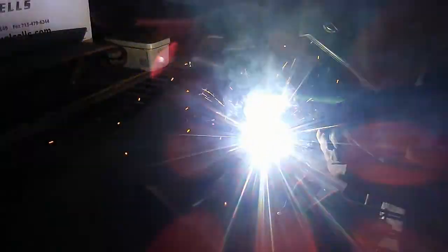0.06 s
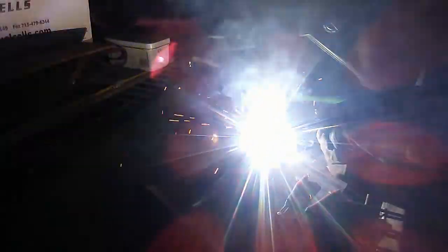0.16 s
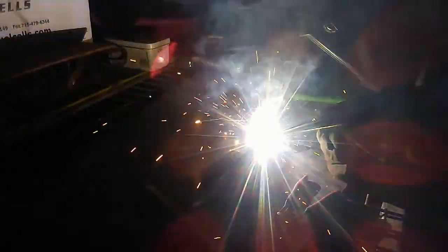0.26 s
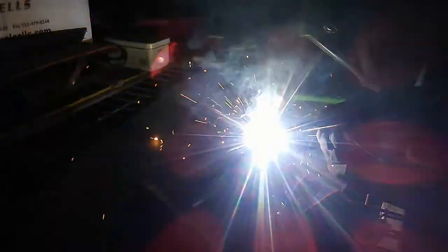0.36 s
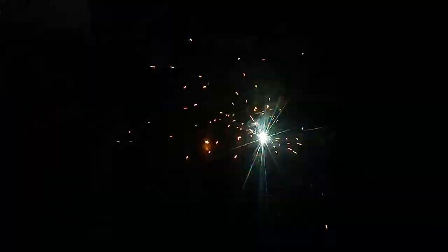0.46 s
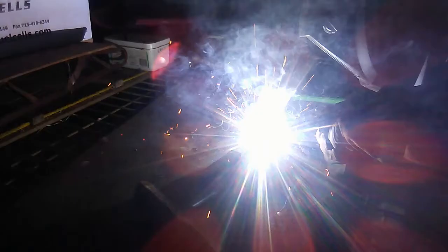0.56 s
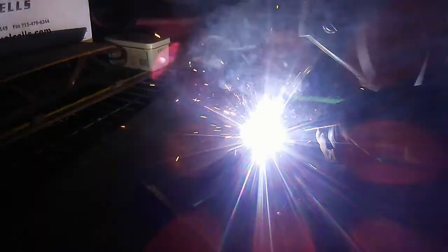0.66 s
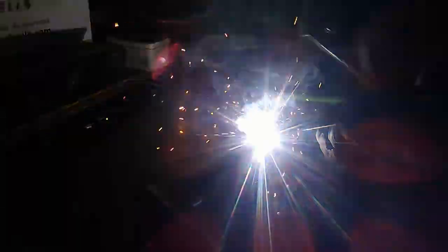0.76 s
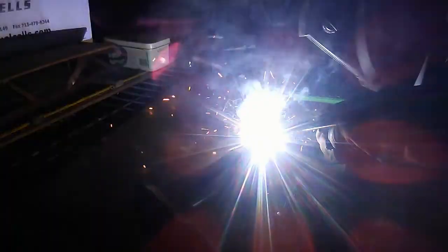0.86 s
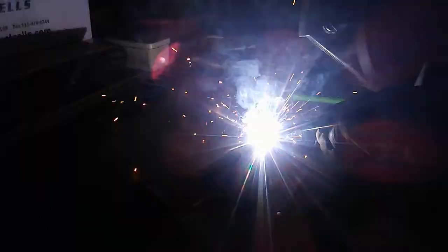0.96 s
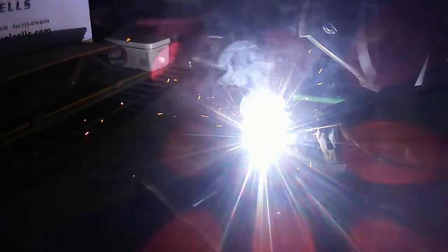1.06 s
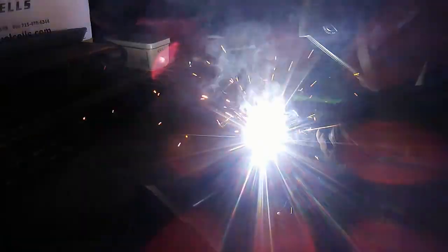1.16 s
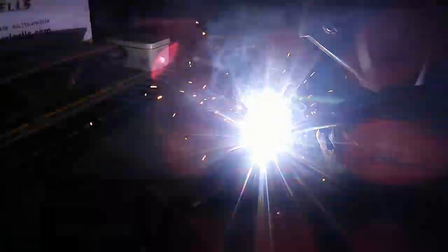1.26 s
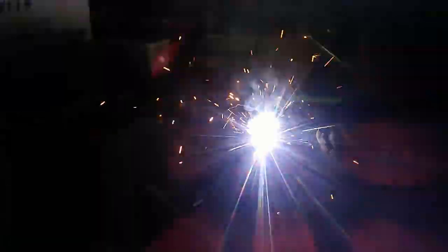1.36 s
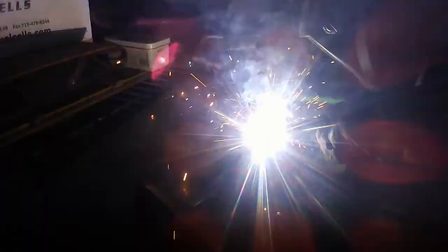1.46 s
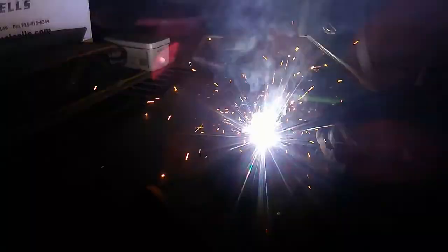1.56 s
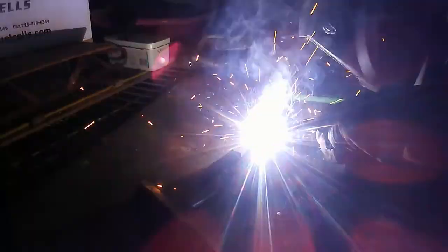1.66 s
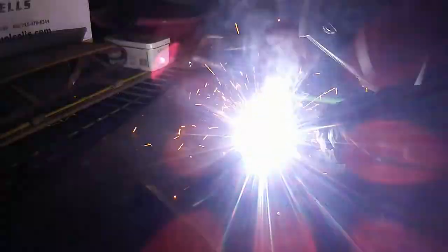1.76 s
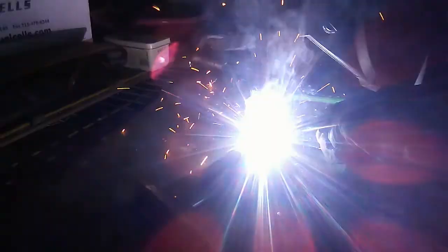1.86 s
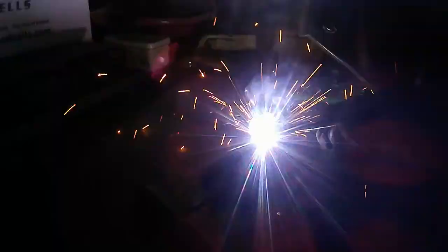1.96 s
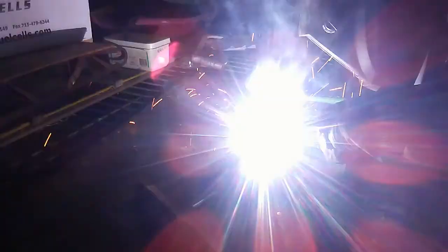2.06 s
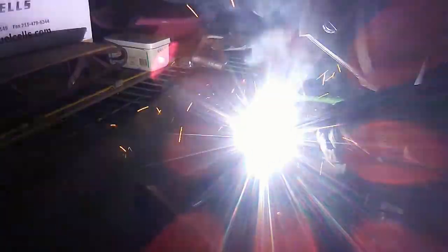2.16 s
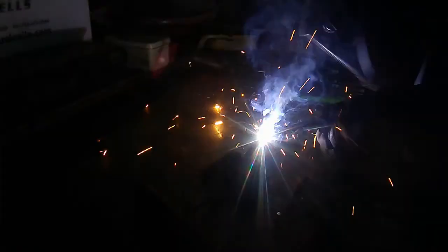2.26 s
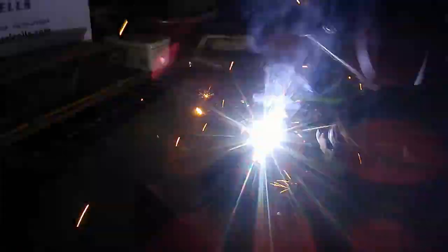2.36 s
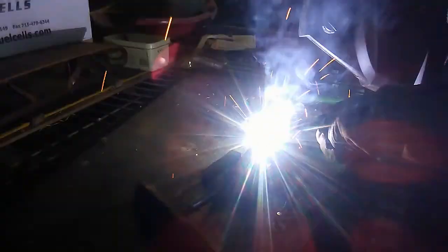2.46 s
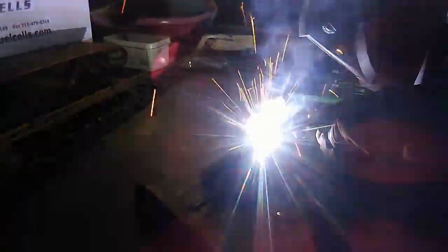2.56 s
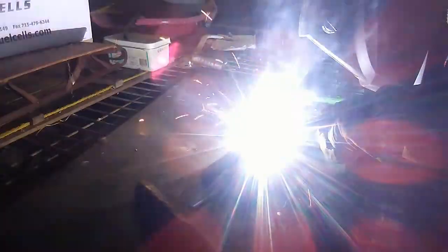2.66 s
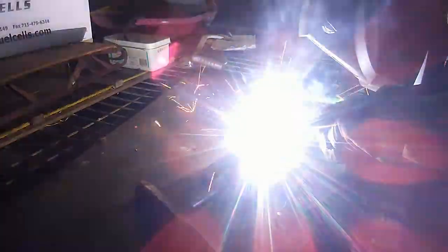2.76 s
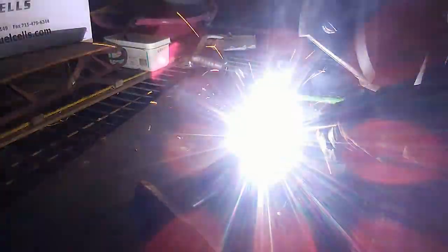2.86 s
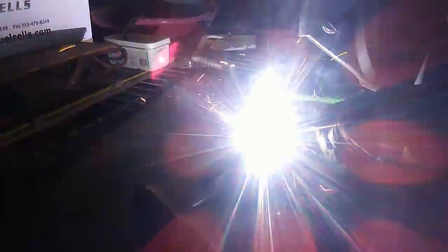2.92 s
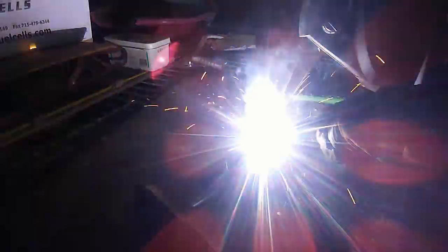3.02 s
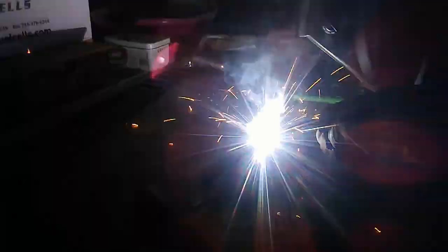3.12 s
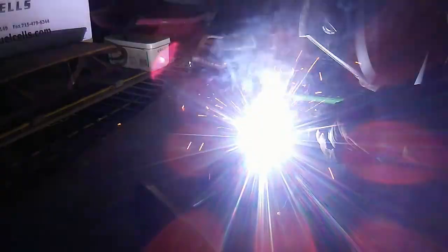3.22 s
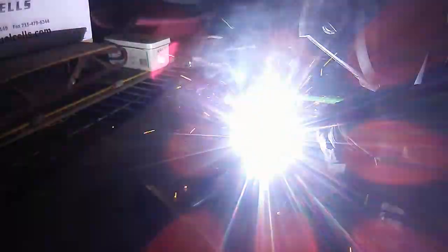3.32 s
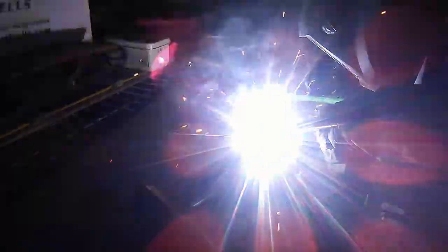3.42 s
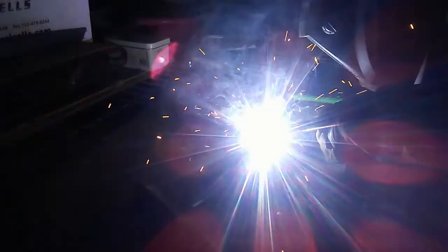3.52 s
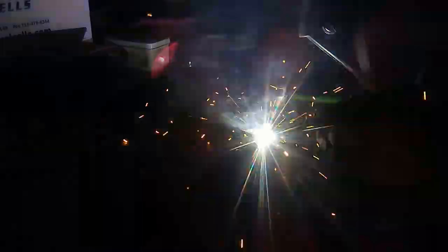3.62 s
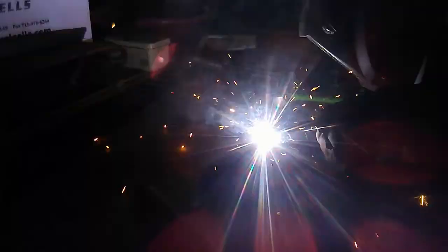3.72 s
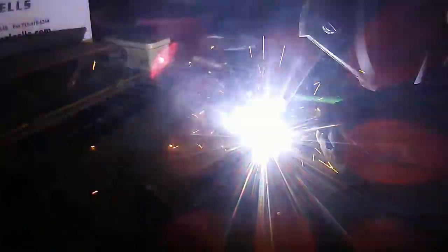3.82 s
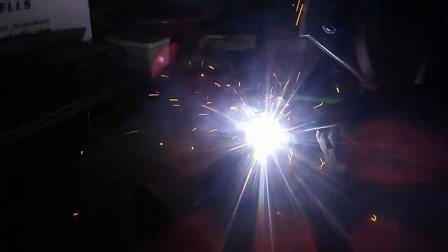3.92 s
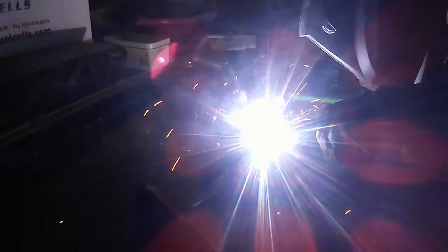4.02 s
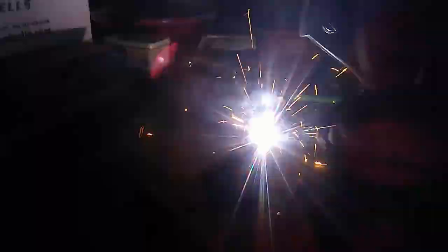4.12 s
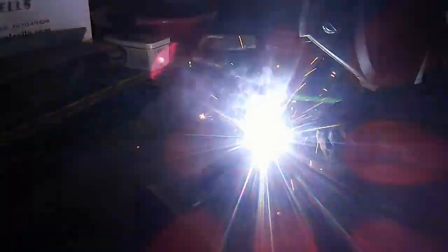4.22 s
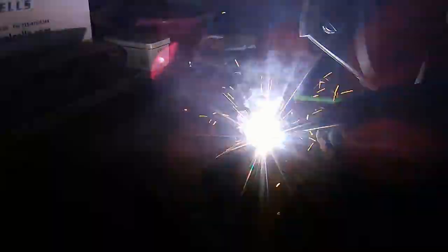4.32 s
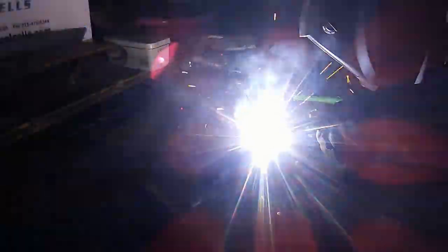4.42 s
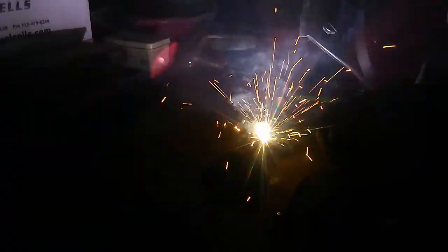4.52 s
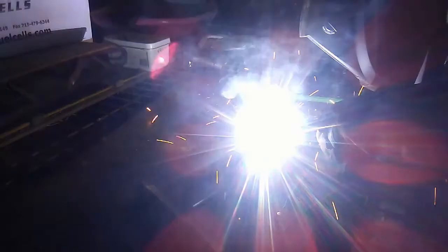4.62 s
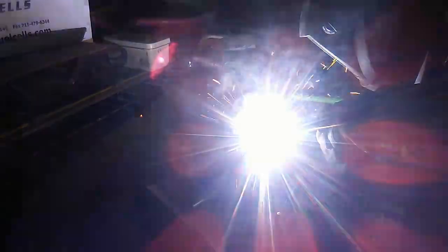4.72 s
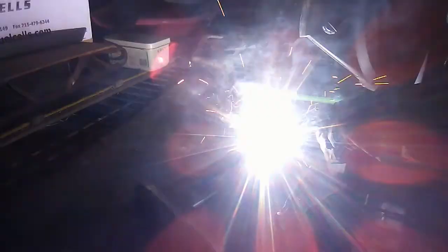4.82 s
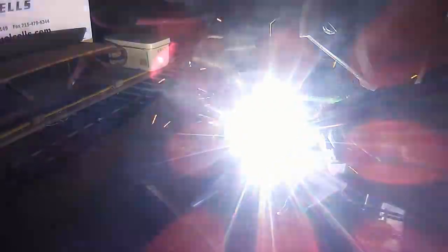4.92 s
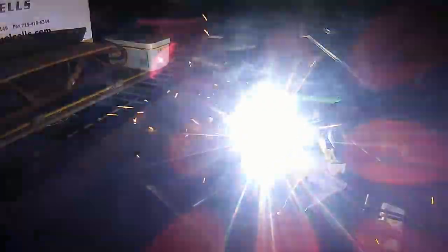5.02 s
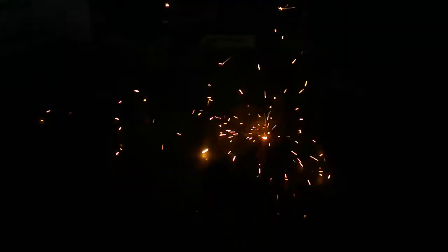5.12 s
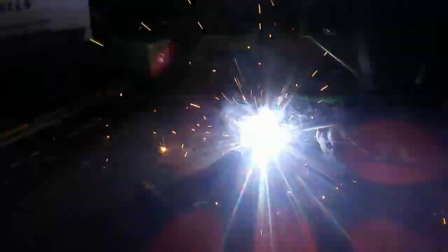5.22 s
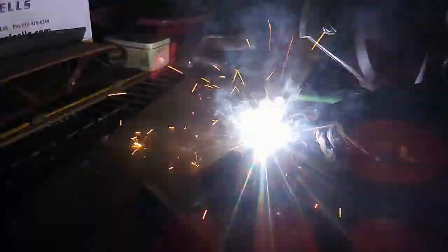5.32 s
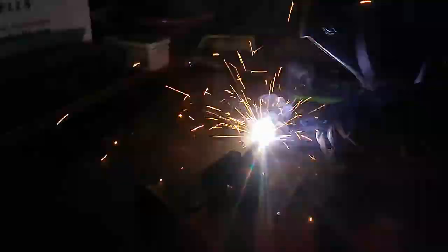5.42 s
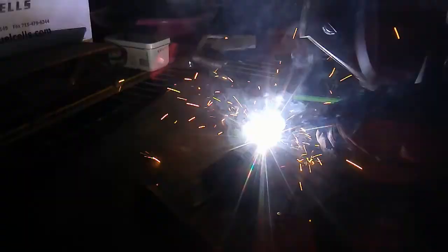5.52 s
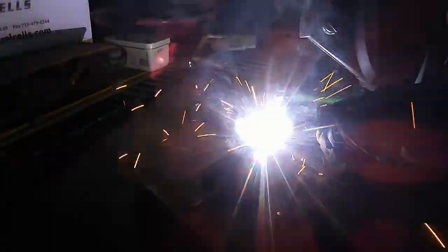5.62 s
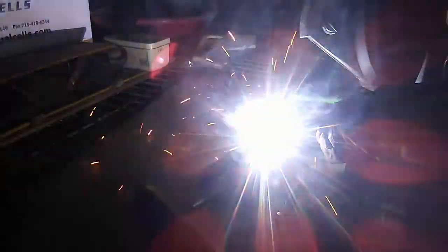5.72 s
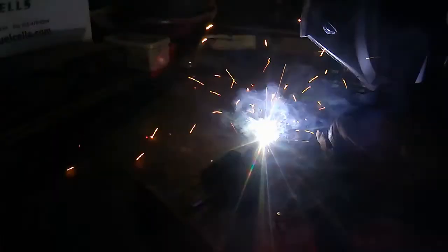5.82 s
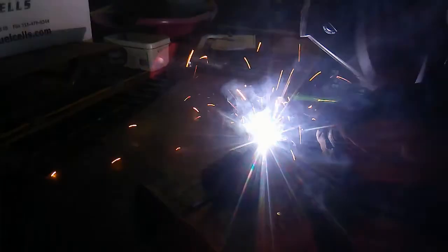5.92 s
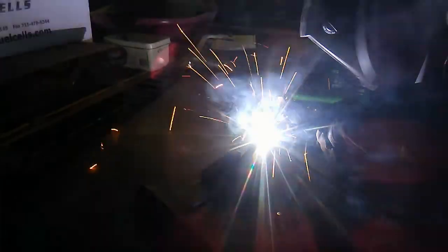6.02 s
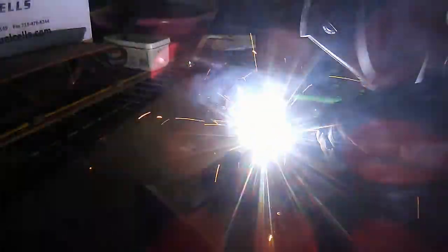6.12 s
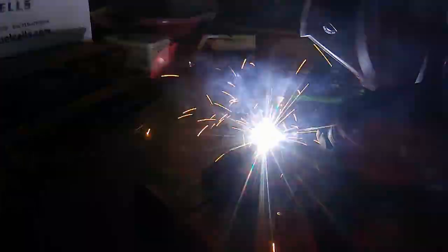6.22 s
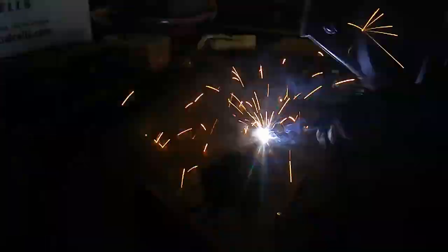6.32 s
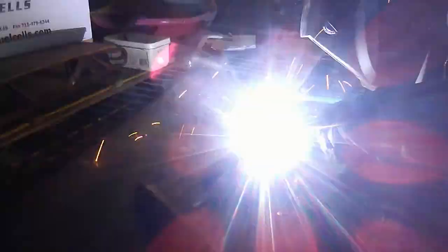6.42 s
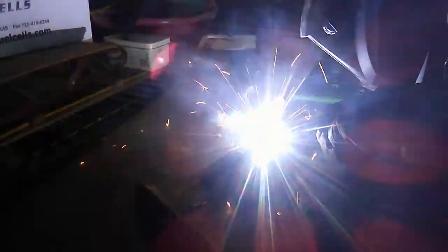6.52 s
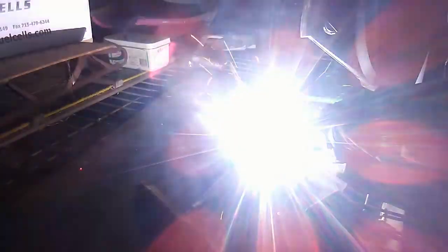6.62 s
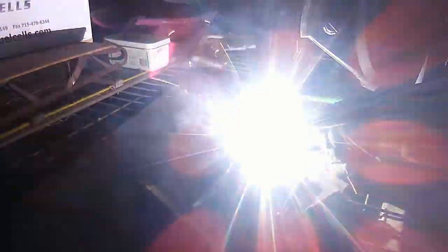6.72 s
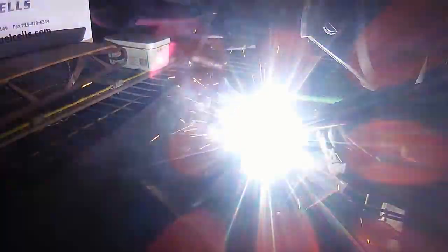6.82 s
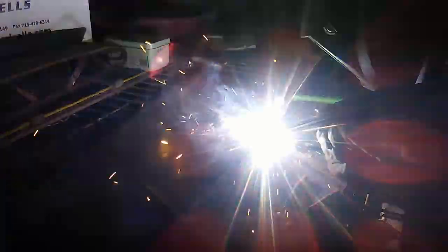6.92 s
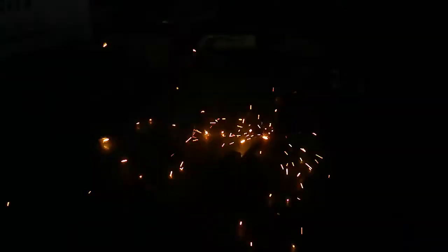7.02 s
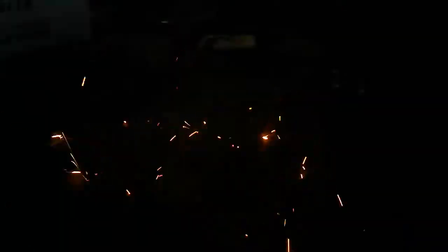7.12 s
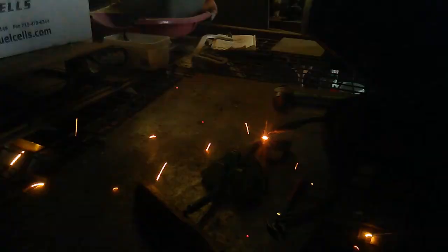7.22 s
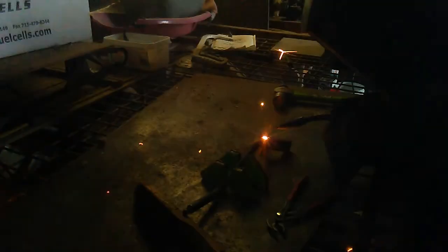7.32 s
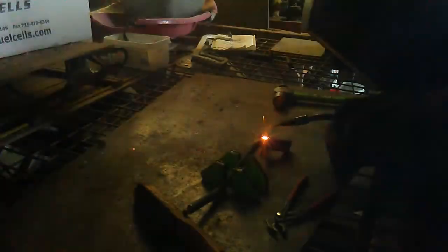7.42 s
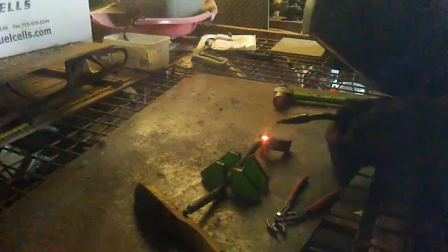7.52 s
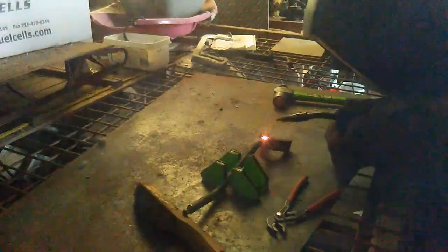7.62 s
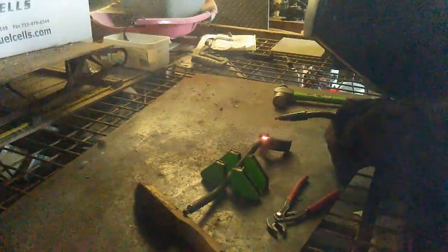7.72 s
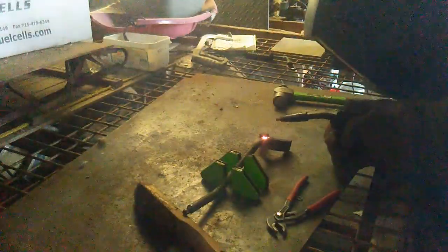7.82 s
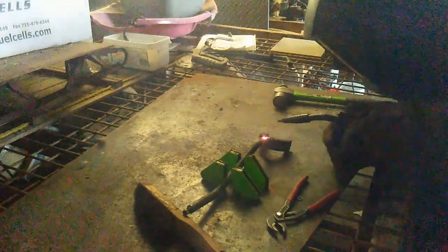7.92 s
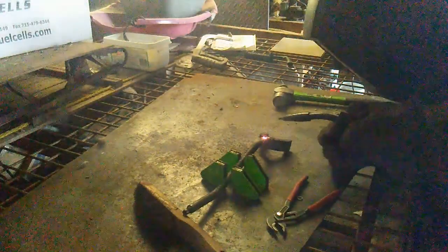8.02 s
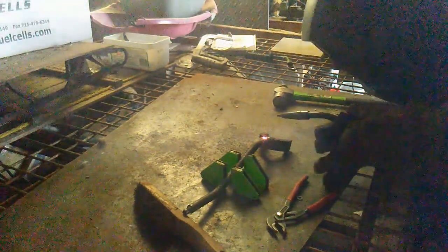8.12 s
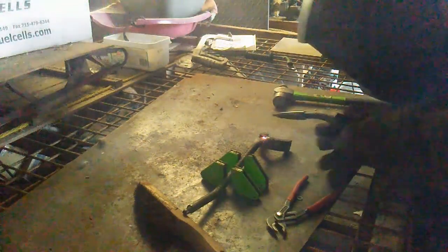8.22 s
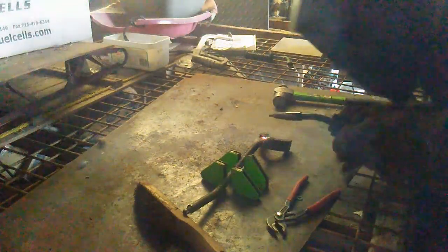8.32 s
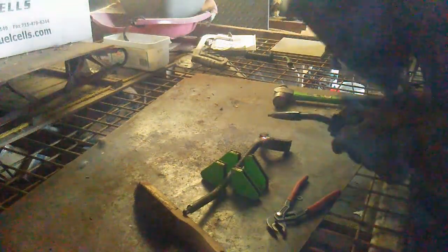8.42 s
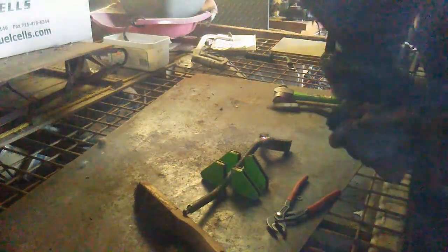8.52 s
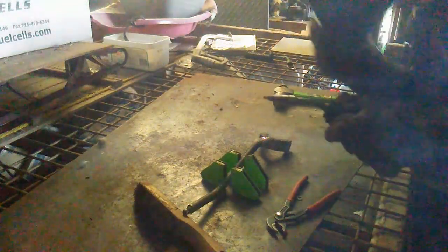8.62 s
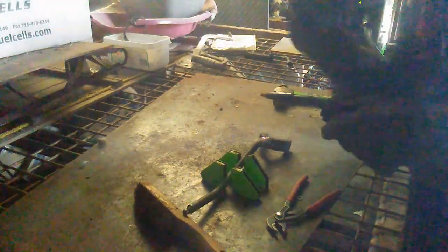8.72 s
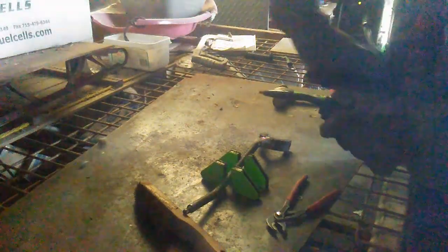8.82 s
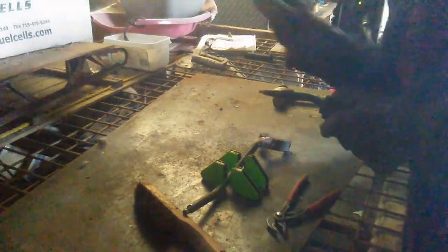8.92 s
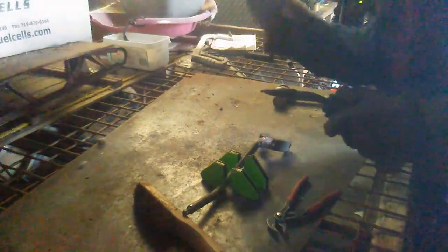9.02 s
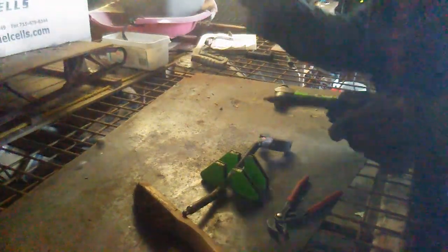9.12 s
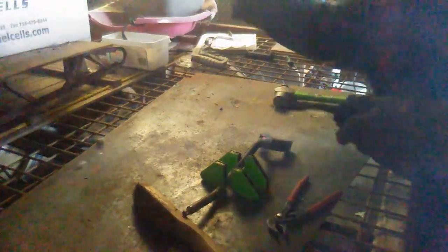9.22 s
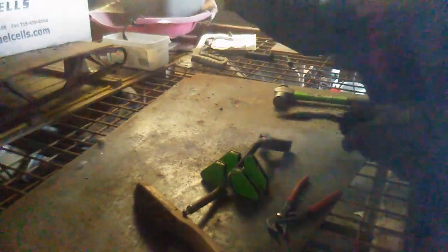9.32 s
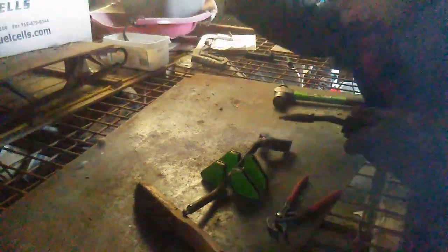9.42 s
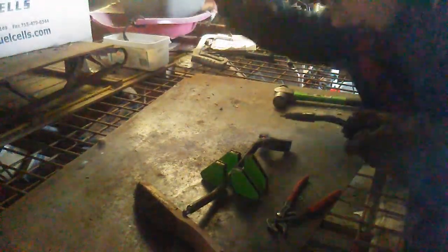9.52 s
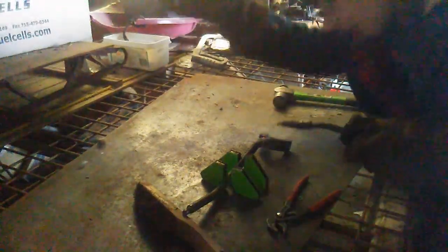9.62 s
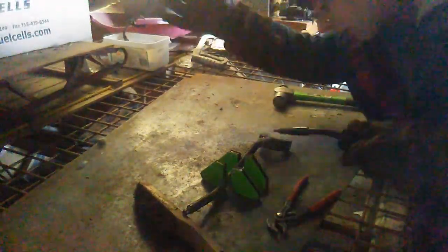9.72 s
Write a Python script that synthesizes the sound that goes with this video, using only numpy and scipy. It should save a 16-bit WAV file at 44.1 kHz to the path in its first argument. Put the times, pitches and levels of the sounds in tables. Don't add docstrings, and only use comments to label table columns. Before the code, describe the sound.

A wire-feed welder crackles and spits loudly up close, stops dead after about seven seconds, leaving a quiet fan and rustling, scraping gear.

```python
import sys
import numpy as np
from scipy import signal
from scipy.fft import rfft, irfft
from scipy.io import wavfile

SR = 44100
rng = np.random.default_rng(int(sys.argv[2]) if len(sys.argv) > 2 else 0)


def voltage_ratio(decibels):
    exponent = np.asarray(decibels, float) / 20
    return 10 ** exponent


def pcm_store(signal):
    levels = np.round(np.clip(np.atleast_2d(signal), -1, 1) * 32767)
    wavfile.write(sys.argv[1], SR, levels.astype(np.int16).T)


N = 430857


def rms_one(x):
    return x / np.sqrt(np.mean(x ** 2) + 1e-20)


def level(rows):
    s, db = np.transpose(rows)
    return voltage_ratio(np.interp(np.arange(N) / SR, s, db, left=-200, right=-200))


def at_hz(points, hz):
    table_hz, values = np.transpose(points)
    return np.interp(np.log(hz + 1), np.log(table_hz), values)


def coloured(x, points, size=8192):
    shape_db = at_hz(points, np.fft.rfftfreq(size, 1 / SR))
    cepstrum = irfft(np.log(voltage_ratio(shape_db)))
    cepstrum[1:size // 2] *= 2
    cepstrum[size // 2 + 1:] = 0
    impulse_response = irfft(np.exp(rfft(cepstrum)))
    return signal.fftconvolve(x, impulse_response)[:len(x)]


def resonance(x, hz, width_hz):
    r = np.exp(-np.pi * width_hz / SR)
    poles = [1, -2 * r * np.cos(2 * np.pi * hz / SR), r * r]
    return signal.lfilter([(1 - r * r) / 2, 0, (r * r - 1) / 2], poles, x + 1e-18)


def low_pass(x, hz):
    return signal.sosfilt(signal.butter(2, hz, fs=SR, output="sos"), x)


def dying(x, t60):
    return signal.lfilter([1], [1, -voltage_ratio(-60 / (t60 * SR))], x)


def clicks(times, gains):
    out = np.zeros(N)
    places = (np.asarray(times) * SR).astype(int)
    np.add.at(out, np.minimum(places, N - 1), gains)
    return out


def grains(per_s, spread_db):
    sizes = voltage_ratio(spread_db * np.minimum(rng.exponential(1, N), 3))
    signs = rng.choice([-1, 1], N)
    return rms_one(sizes * signs * (rng.random(N) < per_s / SR))


def drift(per_s):
    knots = rng.standard_normal(N // 256 + 2)
    return rms_one(np.interp(np.arange(N) * per_s / SR, np.arange(len(knots)), knots))


# pitch_hz, width_hz, lift_db
RINGS = [(900, 20, 0.5), (3372, 45, -2), (3790, 160, -4), (7400, 130, -5), (8300, 110, -7)]
# pitch_hz, level_db
MIC = [(40, -45), (110, -44.5), (220, -15), (480, -1.5), (1600, 0.5), (2100, -7.5), (3200, -0.5), (4080, 0),
       (4330, -16.5), (5000, -24), (5900, -8), (8000, 1.5), (13300, -10.5), (15600, -15.5)]


def microphone(x):
    for hz, width_hz, db in RINGS:
        x = x + voltage_ratio(db) * resonance(x, hz, width_hz)
    return coloured(x, MIC)


# pitch_hz, level_db
FAN_TONES = [(398, -64), (468, -63), (516.8, -52), (710.6, -64), (1034, -64), (1184, -64), (1475, -64)]
# pitch_hz, level_db (per Hz)
FAN_AIR = [(40, 8.5), (85, 14.5), (130, -1), (250, -0.5), (500, -9), (1200, -18), (1800, -17),
           (2600, -16.5), (4000, -29.5), (7000, -52), (15500, -33)]


def fan():
    out = rms_one(microphone(coloured(rng.standard_normal(N), FAN_AIR))) * voltage_ratio(-47)
    t = np.arange(N) / SR
    for hz, db in FAN_TONES:
        tone = np.sqrt(2) * np.sin(2 * np.pi * (hz * t + rng.random()))
        waver = rms_one(resonance(rng.standard_normal(N), hz, width_hz=11.0))
        out += voltage_ratio(db) * (tone + 0.3 * waver)
    return out


# pitch_hz, t60_s
GARAGE = [(200, .42), (1000, .42), (3500, .4), (8000, .37), (14000, .31)]
# pitch_hz, level_db
RETURN = [(200, 4.5), (280, 0), (500, -11), (1500, -1.5), (2200, 5.5), (3700, 3.5), (6000, 2), (9000, -1.5),
          (15500, 2.5)]


def answer():
    t = np.arange(SR // 2) / SR
    edges = 125 * 2 ** np.arange(0, 7.2, .5)
    tail = 0
    for low, high in zip(edges, edges[1:]):
        band_pass = signal.butter(2, [low, high], "band", fs=SR, output="sos")
        band = signal.sosfilt(band_pass, rng.standard_normal(len(t)))
        tail = tail + band * voltage_ratio(-60 * t / at_hz(GARAGE, np.sqrt(low * high)))
    tail = voltage_ratio(-33.5) * tail * np.clip(t / 0.0023, 0, 1)
    near = voltage_ratio(-19.5) * rng.standard_normal(len(t)) * voltage_ratio(-60 * t / 0.0085)
    near = near * np.clip(t / 0.00023, 0, 1)
    return coloured(tail + near, RETURN)


# delay_s, level_db, centre_hz, width_hz
ECHOES = [
    (.0015, -1.5, 3760, 903),
    (.0026, -1.5, 7000, 5180),
    (.0026, -13.5, 700, 900),
    (.0043, -3, 3600, 1500),
    (0.015, -26, 8000, 8e3),
]


def surroundings(x):
    turn = 1.385 * drift(per_s=6.0)
    hard = 0
    for s, db, hz, width_hz in ECHOES:
        hard = hard + resonance(clicks([s], voltage_ratio(db))[:SR // 10], hz, width_hz)
    out = signal.fftconvolve(x, hard)[:N]
    for share in (np.cos(turn), np.sin(turn)):
        out = out + signal.fftconvolve(x * share, answer())[:N]
    return out


def strokes(rows):
    gain = 0
    for s, swell, sink, db in rows:
        gain = gain + level([(s - swell, db - 20), (s, db), (s + sink, db - 20)])
    return gain


# strongest_s, swell_s, sink_s, level_db
RUSTLE = [(7.355, .06, 0.054, -56), (7.43, 0.055, 0.1, -62), (7.63, 0.13, .12, -72), (7.79, .1, .1, -72.5),
          (7.94, 0.09, 0.13, -75), (8.13, 0.051, 0.21, -52), (8.38, .45, .45, -55), (8.74, .14, .2, -57),
          (8.91, .03, .1, -55), (9.02, .16, .16, -45), (9.2, .3, .4, -62), (9.43, .06, .15, -58),
          (9.64, 0.18, .35, -62)]


def rustle():
    cloth = low_pass(grains(12000, spread_db=3.0), hz=10600)
    cloth = (cloth - low_pass(cloth, hz=3500)) * voltage_ratio(1.5 * drift(per_s=40))
    return voltage_ratio(5.0) * strokes(RUSTLE) * cloth


# strongest_s, swell_s, sink_s, level_db
SCRAPE = [
    (8.685, .035, .025, -42),
    (8.738, .025, .04, -39),
    (8.908, .012, .06, -42),
    (8.965, .05, .05, -41),
    (8.995, .04, .03, -37),
    (9.025, .02, .06, -35),
    (9.06, .04, .05, -39),
    (9.095, .04, .04, -41),
    (9.47, .1, .1, -48),
]


def scrape():
    grit = grains(4000, spread_db=2.0) * voltage_ratio(1.2 * drift(per_s=90))
    grit = low_pass(low_pass(grit, hz=4500), hz=2720)
    return voltage_ratio(2.0) * strokes(SCRAPE) * rms_one(grit)


# start_s, peak_db, pitch_hz, t60_s
KNOCKS = [
    (8.735, -23.5, 418, 0.028),
    (9.0184, -20, 1420, 0.0067),
    (9.339, -24, 457, 0.044),
]


def knocks():
    out = np.zeros(N)
    for s, db, hz, t60 in KNOCKS:
        width_hz = np.log(1000) / (np.pi * t60)
        peak = voltage_ratio(db - 1.5) * SR / (2 * np.pi * width_hz)
        soft_blow = low_pass(clicks([s], peak), 2 * hz)
        out += resonance(soft_blow, hz, width_hz)
    return out


# start_s, peak_db
TICKS = [
    (8.6874, -24),
    (8.9895, -37),
    (9.0167, -27.5),
    (9.2275, -30),
    (9.2352, -30),
]


def crease_snaps():
    s, db = np.transpose(TICKS)
    burst = dying(clicks(s, voltage_ratio(db - 6.5)), t60=0.023)
    burst = low_pass(burst * rng.standard_normal(N), hz=7500)
    return np.diff(burst, n=2, prepend=[0, 0])


def handling():
    return rustle() + scrape() + knocks() + crease_snaps()


# start_s, bluntness (0-1)
BLUNT = [(0, 0.07), (2.2, 0.09), (4.5, 1), (6.3, 1), (7.1, 0.78)]


def crack(s, db):
    blunt = np.interp(s, *np.transpose(BLUNT)) + 0.18 * rng.standard_normal(len(s))
    blunt = np.clip(blunt, 0, 1)
    shares = [1 - blunt / 2, blunt, blunt / 2]
    return sum(clicks(s + k / SR, -voltage_ratio(db) * share) for k, share in enumerate(shares))


# restrike_s, lull_s, sink_db, crack_db, thump_db
STUMBLES = [(6.66, .025, -12, -3, -16.5), (0.662, 0.17, -28, -8.5, -31), (0.8483, 0.043, -8, 0, -37),
            (1.0289, 0.045, -6, 2.5, -13.5), (1.1806, 0.039, -7, 3.5, -26), (1.405, 0.055, -15, 2.5, -13),
            (1.5518, 0.049, -7, -1, -15), (1.645, 0.043, -16, 5, -16), (1.8, 0.05, -14, .5, -7),
            (1.945, 0.048, -9, -0.5, -20), (2.2804, 0.053, -15, 2, -8), (2.403, 0.08, -21.5, -10, -12),
            (2.4893, 0.078, -28, -2.5, -7.5), (2.5608, 0.039, -7.5, -13, -16), (2.9819, .035, 1, 0, -10),
            (3.2925, 0.063, -16, -5.5, -16), (3.6358, 0.073, -14.5, -3, -24), (3.9601, 0.018, -8, -2.5, -8),
            (4.17, 0.18, -2, -2, -6.5), (4.6944, 0.031, -12, -4.5, -15), (5.3165, 0.13, -23, -1.5, 2),
            (5.36, 0.036, -8, 2.5, -4), (5.954, 0.045, -21, -19, -15), (6.6273, 0.068, -14.5, -6.5, -25)]


def lulls_db(t):
    return sum(db * np.clip(1 - (s - t) / lull, 0, 1) * (t < s) for s, lull, db, *_ in STUMBLES)


THUMP_BELOW_DB = -11.5
# start_s, largest_peak_db
DROPLET_TOP = [(0, -8), (1.2, -9), (2, -2.5), (2.9, -8.5), (3.6, -2.5), (4.3, -9.5), (5.2, -9.5), (5.5, -8),
               (6.4, -9.5), (6.75, -5), (7.14, -9)]


def droplets():
    place, size, gas = rng.random((280, 3)).T
    s = place * DROPLET_TOP[-1][0]
    top_db = np.interp(s, *np.transpose(DROPLET_TOP)) + 2.0 * lulls_db(s)
    push_db = top_db + THUMP_BELOW_DB + 12.5 * np.log(1 / gas - 1) / 2
    push_db = np.minimum(push_db, -11)
    return np.c_[s, top_db + 1.5 * np.log(size), push_db]


# start_s, level_db
SIZZLE = [(0, -30.5), (.4, -30), (1, -29), (1.5, -28.5), (2.2, -30.5), (2.7, -31.5), (3.3, -29.5),
          (3.6, -29.5), (4.2, -31.5), (4.7, -31), (5.15, -27.5), (5.4, -33.5), (5.9, -30), (6.4, -33),
          (6.7, -30), (7.1, -29.5), (7.14, -44.5)]


def spatter():
    flutter = voltage_ratio(5 * np.tanh(drift(per_s=60)))
    vigour = voltage_ratio(2.0 + lulls_db(np.arange(N) / SR)) * level(SIZZLE)
    return vigour * flutter * grains(1800, spread_db=5.0)


# start_s, crack_db, thump_db (peaks)
BURSTS = [(0.0647, -3, -13.5), (0.2585, 0.5, -9.5), (0.3721, 0.5, -9), (0.6866, 1, -7), (0.763, 0, -9.5),
          (1.3197, -1, -14), (1.5879, 1, -9.5), (1.731, -2, -10), (1.8141, 3, -12), (1.865, 2.5, -6.5),
          (2.008, -24, -8), (2.0313, -3, -9.5), (2.152, 0, -8.5), (2.6653, -3.5, -10.5), (2.837, -4.5, -7),
          (3.1778, -27, -11), (4.5603, -2.5, -6), (5.0509, -17.5, -5), (5.1003, -15.5, -9),
          (5.4339, -6, -5), (5.4764, -3, -8), (5.5087, -2, -6.5), (5.5684, -2.5, -7), (5.8715, -10, -10),
          (6.06, -3, -8.5), (6.1148, -6, -5.5), (6.1888, 0.5, -4.5), (6.698, -3.5, -5), (6.757, -1.5, -13),
          (6.9466, -11, -7.5)]
# start_s, crack_db, thump_db (peaks)
POPS = [(.0547, -3, -26), (.2095, -1.5, -24), (.4533, -7, -26), (.695, -2, -8), (.7847, -5, -23),
        (1.2962, -3, -20), (1.4203, -7.5, -18), (1.5702, -5, -8.5), (1.8501, 0, -22), (2.0779, -4, -14),
        (2.1698, -2, -15), (3.001, -5, -27), (3.126, -7, -18), (3.1604, -4.5, -12), (3.459, -8, -25),
        (3.5134, -14, -26), (3.7367, -6, -33), (4.1848, -3, -22), (4.2448, -14, -22), (4.5822, -1, -25),
        (5.5853, -7.5, -9), (5.6536, -9, -9), (5.7061, -19, -8.5), (5.7932, -7, -6), (6.1503, -13, -12),
        (6.407, -4.5, -10.5), (6.559, -4.5, -14), (6.7081, 0.5, -26), (6.862, -14, -8), (7.037, -9, -17)]
# start_s, peak_db
SNAPS = [(.19, -3), (0.3021, -2), (.701, 1.5), (.928, -.5), (0.9749, -1.5), (1.07, -4.5), (1.2335, -2.5),
         (1.493, -16), (1.675, 0), (1.9052, -2), (2.2177, -2.5), (2.6049, -1.5), (2.6438, 2), (2.724, 0.5),
         (2.777, -2.5), (2.8914, -3), (3.1981, -3.5), (3.4292, -5), (3.662, -7), (3.8835, -4.5),
         (4.0488, -6), (4.1018, -4), (4.2115, -1.5), (4.422, -6), (4.8488, -4), (5.52, -17), (6.5218, -4.5),
         (0.023, .5), (6.7417, 0), (6.8063, -3)]


def arc():
    restrikes = [(s, crack_db, thump_db) for s, _, _, crack_db, thump_db in STUMBLES]
    snaps = [(s, db, db + THUMP_BELOW_DB) for s, db in SNAPS]
    s, crack_db, thump_db = np.r_[restrikes, BURSTS, POPS, snaps, droplets()].T
    strikes = crack(s, crack_db + 8.0)
    fizz = voltage_ratio(-28.5) * dying(np.abs(strikes), t60=0.015) * grains(6000, spread_db=-4.5)
    sizzle = spatter()
    pushes = clicks(s, -voltage_ratio(np.minimum(thump_db, 1) + 20.0))
    thumps = low_pass(pushes, hz=1500) + low_pass(sizzle, hz=1242)
    thumps = thumps - low_pass(thumps, hz=90)
    return strikes + fizz + sizzle, thumps


# pitch_hz, level_db
CRACK = [(300, 4), (1500, -19), (2600, -2), (3800, -41), (6000, -0.5), (9000, 6), (15500, 0.5)]


def scene():
    cracks, thumps = arc()
    hands = handling()
    direct = coloured(cracks, CRACK) + thumps + hands
    room = surroundings(cracks + thumps + voltage_ratio(-7.0) * hands)
    return (microphone(direct + room) + fan())[None]


def band_limit(x):
    return signal.sosfilt(signal.butter(12, 17000, fs=SR, output="sos"), x)


def record(dry):
    rounded = dry / (1 + (dry / .83) ** 6) ** (1 / 6)
    rounded = rounded - low_pass(rounded - dry, hz=200)
    top_cut = signal.ellip(12, .5, 45, 15750, fs=SR, output="sos")
    low_cut = signal.butter(2, 45, "high", fs=SR, output="sos")
    mix = signal.sosfilt(np.r_[top_cut, low_cut], rounded)
    return band_limit(mix)


dry = scene()
out = record(dry)
pcm_store(out)
```